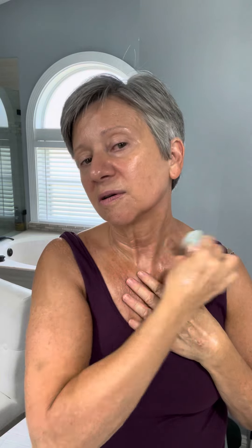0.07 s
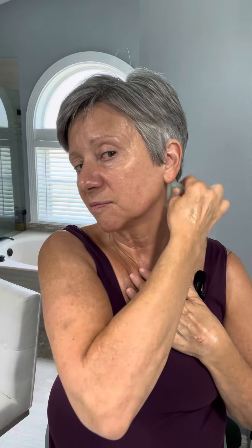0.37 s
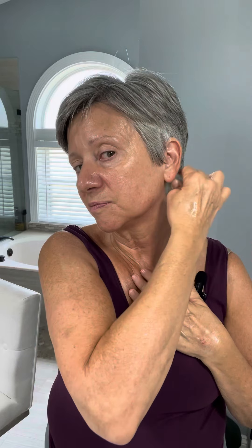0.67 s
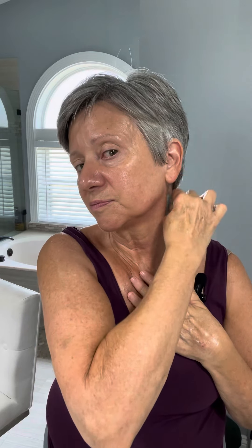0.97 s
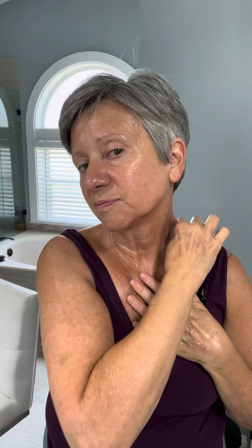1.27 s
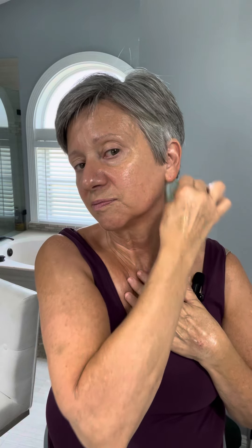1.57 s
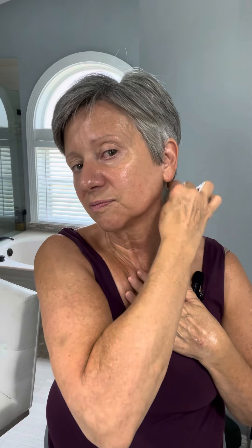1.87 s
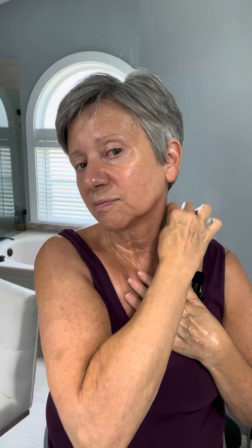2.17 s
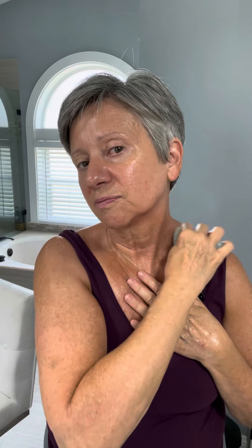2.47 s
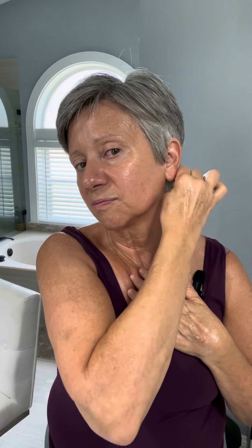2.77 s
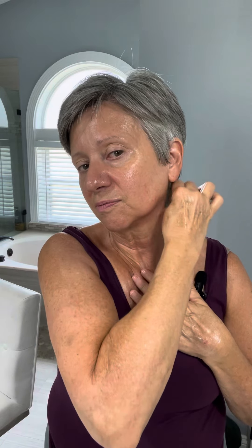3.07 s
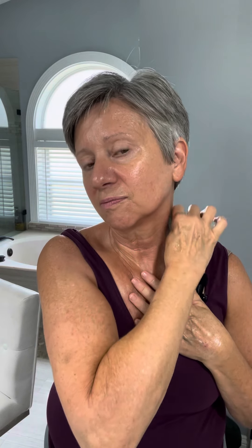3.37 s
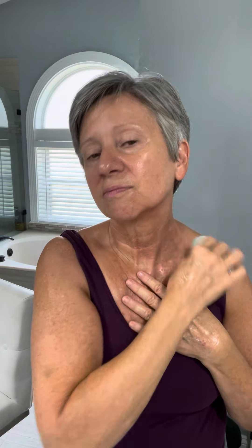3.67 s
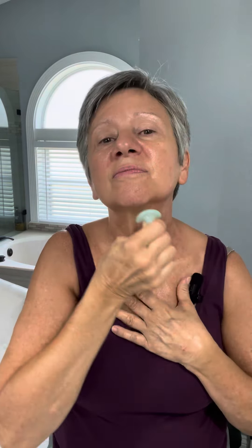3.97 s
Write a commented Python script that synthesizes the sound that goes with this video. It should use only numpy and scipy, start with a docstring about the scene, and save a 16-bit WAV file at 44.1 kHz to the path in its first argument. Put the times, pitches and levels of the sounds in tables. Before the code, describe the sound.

A small suction cup pops off oiled skin right at the start, then more softly at about 1.1 seconds. A louder, fluttering pop comes at 2.2 seconds and a doubled one around 3.5 seconds. Each has a tiny wet squeak, a fizz of air and a hollow puff, ringing briefly in a tiled bathroom. A faint, low ventilation hum runs underneath.

```python
"""A small soft suction cup, drawn down oiled skin, is pulled off four times in a tiled bathroom.
As the seal breaks, the rim flutters against the skin and rings the cup, air fizzes in through the
wet gap, the opening gap gives mostly falling tones, and the freed cup puffs hollowly.
The room rings on over a low ventilation hum."""
import sys
import numpy as np
from scipy import signal
from scipy.fft import rfft, irfft
from scipy.io import wavfile

SR = 44100
rng = np.random.default_rng(int(sys.argv[2]) if len(sys.argv) > 2 else 0)


def materialize(psi):
    """Save the field psi as 16-bit PCM at rate SR to the path in sys.argv[1].

    A 1-D psi becomes a single channel; in a 2-D psi each row is a channel.
    """
    bounded = np.clip(np.atleast_2d(psi).T, -1, 1)
    quanta = np.round(bounded * 32767).astype(np.int16)
    wavfile.write(sys.argv[1], SR, quanta)


N = 176400

# ventilation rumble spectrum: freq_hz, relative_db
RUMBLE_SPECTRUM = [(15, -61), (25, -24.5), (33, -8.5), (43, -2.5), (64, -2), (85, -7), (118, -6.5),
                   (150, -19), (250, -24), (326, -25), (450, -39.5), (1000, -47.5), (3000, -54.5),
                   (7000, -58.5), (15000, -64.5)]
# ventilation hum before the bass swell: pitch_hz, level_db
HUM_TONES = [(59.2, -59), (107.7, -72.5)]
# ventilation bass swell: time_s, gain_db
BASS_SWELL = [(0, 6.5), (.4, -1.5), (.8, -3.5), (1.7, -5.5), (2.35, -1), (2.6, -1), (3.3, 1.5), (3.7, 7.5),
              (4, 1.5)]
# air inrush: start_s, swell_s, fade_s, onset_re_peak_db, hiss_db, fizz_db
AIR_RUSHES = [(0.028, 0.0065, 0.066, -1.5, -43, -46.5), (1.0800, 0.032, 0.12, -14, -48, -53.5),
              (2.239, 0.029, 0.031, -4.5, -37, -42), (3.4189, 0.032, .012, -7, -29, -43.5),
              (3.468, 0.034, .038, -8, -28.5, -32)]
# hiss past the rim: freq_hz, relative_db
HISS_SPECTRUM = [(200, -10.5), (600, -5), (1500, 6), (2400, 1), (3200, -1), (4400, -8.5), (5200, -5),
                 (6000, -7), (6900, -3), (8100, -11.5), (9000, -35.5), (11000, -26.5), (16000, -40.5)]
# oil film fizz: freq_hz, relative_db
FIZZ_SPECTRUM = [(3000, -37), (6500, -20.5), (9000, -29), (10300, 3), (12300, 4.5), (14200, -15.5),
                 (15300, 1), (16500, -12)]
# rim flutter: start_s, swell_s, fade_s, start_hz, peak_hz, end_hz, onset_re_peak_db, slap_db, snap_db
RIM_FLUTTERS = [(0.0309, 0.0062, 0.0022, 340, 338, 350, -11, -7.5, -36.5),
                (1.1025, 0.0076, 0.026, 493, 477.3, 441, -20, -22.5, -47),
                (2.235, .0100, 0.046, 166.6, 250.7, 310.2, -3, 9.5, -27.5),
                (3.4213, 0.024, 0.028, 219.6, 238.3, 203, -8.5, 9, -34),
                (3.4734, 0.029, 0.028, 225.6, 240.5, 350, -15, 18, -36)]
# cup response to a slap: freq_hz, gain_db
CUP_RESPONSE = [(30, -60.5), (130, -40), (300, -15), (550, -16.5), (760, -11), (930, -0.5), (1080, 5),
                (1380, -2.5), (1620, -2.5), (1900, -8.5), (2400, -13), (3300, -19.5), (5000, -33.5),
                (6800, -35), (9000, -40.5), (15000, -47.5)]
# snap of the unsticking rim: freq_hz, relative_db
SNAP_SPECTRUM = [(2000, -34), (3200, -5), (5000, -17), (6200, -5.5), (7200, 3.5), (8200, -17),
                 (9000, -30.5), (11000, -12.5), (16000, -21)]
# air tones in the gap: start_s, swell_s, fade_s, start_hz, peak_hz, end_hz, level_db
GAP_TONES = [(0.0314, 0.0019, 0.0061, 1700, 1428, 800, -25), (0.042, .010, 0.069, 221, 109, 98, -33),
             (1.0807, 0.0111, .016, 1402, 1420, 976, -37.5), (1.0990, 0.0175, 0.011, 637, 444, 450, -49),
             (1.1180, .012, 0.0057, 465, 432, 270, -37), (1.1370, .007, 0.019, 335, 279, 213, -34),
             (2.2450, .028, 0.01, 254.2, 255, 230, -30), (2.245, 0.0062, 0.029, 1072, 1055, 716, -25.5),
             (3.502, 0.027, 0.048, 228, 313, 346, -32.5), (3.5080, 0.052, 0.018, 629, 641, 640, -32)]
# puffs as the cup comes free: start_s, swell_s, fade_s, level_db
RELEASE_PUFFS = [(0.038, 0.011, 0.062, -48), (1.089, 0.049, 0.056, -41), (2.242, .028, 0.03, -28),
                 (3.496, 0.015, 0.053, -31)]
# hollow puff spectrum: freq_hz, relative_db
PUFF_SPECTRUM = [(70, -41.5), (160, -23.5), (230, -3.5), (330, -4), (420, 0), (520, 1), (680, 0.5),
                 (900, -3), (2000, -35.5)]
# room decay: freq_hz, t60_s
ROOM_DECAY = [(150, 0.73), (400, 0.5669), (1000, 0.5917), (2800, 0.6314), (7000, 0.5079), (12000, 0.5361),
              (16000, 0.54)]
# reverberation colour: freq_hz, relative_db
TAIL_SPECTRUM = [(60, -13.5), (200, -5.5), (350, 1.5), (700, -0.5), (1300, -4), (3000, 0), (7000, -2.5),
                 (9000, -7.5), (11500, -9.5), (15000, -16.5)]
# room standing waves: freq_hz, t60_s, relative_db
STANDING_WAVES = [(109, 0.57, -39), (303, 0.36, -59.5), (651, 0.81, -57.5), (1070, 0.91, -54),
                  (1240, 0.44, -60)]


def undb(db):
    """Decibels to gain."""
    return 10 ** (np.asarray(db) / 20)


def unit(x):
    """Scale to rms 1."""
    return x / np.sqrt(np.mean(x ** 2))


def at_hz(points, hz):
    """Interpolate (freq_hz, value) points on a log-frequency axis."""
    freqs_hz, values = np.array(points, float).T
    return np.interp(np.log(np.maximum(hz, 1)), np.log(freqs_hz), values)


def colour(x, points):
    """Minimum-phase filter from (freq_hz, gain_db) points."""
    gain = undb(at_hz(points, np.fft.rfftfreq(2 * N, 1 / SR)))
    cepstrum = irfft(np.log(gain))
    cepstrum[1:N] *= 2
    cepstrum[N + 1:] = 0
    return irfft(rfft(x, 2 * N) * np.exp(rfft(cepstrum)))[..., :x.shape[-1]]


def noise(points):
    """Coloured noise, rms 1."""
    return unit(colour(rng.standard_normal(N), points))


def wide_noise(points):
    """Coloured noise, scattered differently to each side by the hand."""
    return np.array([noise(points), noise(points)])


def envelope(start_s, swell_s, fade_s, onset_db, fade_db=-18, attack_s=0.0011, release_s=0.005):
    """Attack to onset_db, swell to 0 dB, fade to fade_db, release."""
    t = np.arange(N) / SR - start_s
    body = undb(np.interp(t, [0, swell_s, swell_s + fade_s], [onset_db, 0, fade_db]))
    attack = np.clip(t / attack_s + 1, 0, 1)
    release = np.exp(-np.maximum(t - swell_s - fade_s, 0) / release_s)
    return body * attack * release


def glide_hz(start_s, swell_s, fade_s, path_hz):
    """Frequency through its start, peak and end values; zero before start_s."""
    t = np.arange(N) / SR - start_s
    return np.interp(t, [0, swell_s, swell_s + fade_s], path_hz) * (t >= 0)


def ventilation(rumble_db=-57.5, diffuse_hz=350, swell_below_hz=85):
    """Rumble and hum: near mono in the bass, diffuse above. Only the bass swells."""
    t = np.arange(N) / SR
    mid = noise(RUMBLE_SPECTRUM)
    side = colour(noise(RUMBLE_SPECTRUM), [(diffuse_hz / 4, -11), (diffuse_hz, -1)])
    hum = sum(np.sqrt(2) * undb(db) * np.sin(2 * np.pi * (hz * t + rng.random()))
              for hz, db in HUM_TONES)
    steady = undb(rumble_db) * np.array([mid + side, mid - side]) + hum
    bass = signal.sosfiltfilt(signal.butter(2, swell_below_hz, fs=SR, output="sos"), steady)
    swell = undb(np.interp(t, *np.array(BASS_SWELL).T))
    return steady + (swell - 1) * bass


def oil_fizz(clicks_per_s=5000, spread_db=2):
    """Dense tiny clicks of uneven size in the oil film, rms 1."""
    size = undb(spread_db * np.minimum(rng.exponential(size=N), 4))
    clicks = (rng.random(N) < clicks_per_s / SR) * size * rng.choice([-1, 1], (2, N))
    return unit(colour(clicks, FIZZ_SPECTRUM))


def air_rush(chop):
    """Air hisses past the rim and fizzes in the oil film, chopped by the flutter."""
    hiss, fizz = wide_noise(HISS_SPECTRUM), oil_fizz()
    return chop * sum(envelope(*timing_s, onset_db) * (undb(hiss_db) * hiss + undb(fizz_db) * fizz)
                      for *timing_s, onset_db, hiss_db, fizz_db in AIR_RUSHES)


def rim_flutter(jitter_cycles=0.012, scatter_db=0.8, lead_cycles=0.12, snap_decay_s=0.00049):
    """The rim snaps loose, admits air, then slaps the skin and rings the cup. Returns sound, air chop."""
    leak, air_decay_cycles = 0.3, 0.25
    t = np.arange(N) / SR
    slaps, snaps, chop = np.zeros(N), np.zeros(N), np.ones(N)
    for start_s, swell_s, fade_s, start_hz, peak_hz, end_hz, onset_db, slap_db, snap_db in RIM_FLUTTERS:
        deviations = rng.standard_normal((N // 100, 2))
        cycles = np.cumsum(glide_hz(start_s, swell_s, fade_s, [start_hz, peak_hz, end_hz])) / SR
        active = (t >= start_s) & (t < start_s + swell_s + fade_s)
        hits = np.flatnonzero(active & (np.diff(np.ceil(cycles), prepend=0) > 0))  # one per cycle
        lag, size = deviations[:len(hits)].T
        force = envelope(start_s, swell_s, fade_s, onset_db)[hits] * undb(scatter_db * size)
        hits += (jitter_cycles * lag * SR / peak_hz).astype(int)
        slaps[hits] += force * undb(slap_db)
        snaps[hits - int(lead_cycles * SR / peak_hz)] += force * undb(snap_db)
        since_snap_cycles = (cycles[active] + lead_cycles) % 1
        chop[active] = unit(leak + np.exp(-since_snap_cycles / air_decay_cycles))
    snap_envelope = signal.lfilter([1], [1, -np.exp(-1 / (snap_decay_s * SR))], snaps)
    return colour(slaps, CUP_RESPONSE) + snap_envelope * wide_noise(SNAP_SPECTRUM), chop


def gap_tones(wobble_depth=0.035, wobble_hz=250, octave_db=-31):
    """Squeaks and plops; pitch wobbles on the wet skin and mostly falls as the gap widens."""
    tones = np.zeros(N)
    wobble = 1 + wobble_depth * noise([(wobble_hz, 0), (4 * wobble_hz, -60)])
    for *timing_s, start_hz, peak_hz, end_hz, level_db in GAP_TONES:
        pitch_hz = glide_hz(*timing_s, [start_hz, peak_hz, end_hz]) * wobble
        phase = 2 * np.pi * np.cumsum(pitch_hz) / SR
        wave = np.sin(phase) + undb(octave_db) * np.sin(2 * phase)
        tones += undb(level_db) * envelope(*timing_s, onset_db=-5.5) * wave
    return tones


def release_puffs():
    """Air tumbles into the open cup."""
    flow = sum(undb(level_db) * envelope(*timing_s, onset_db=-16)
               for *timing_s, level_db in RELEASE_PUFFS)
    return flow * wide_noise(PUFF_SPECTRUM)


def bathroom(direct, tail_db=-2, build_s=0.0027, scatter_db=-6, scatter_s=0.003):
    """Direct sound plus close scatter, the tiled room's diffuse tail and standing waves."""
    t = np.arange(SR) / SR
    bins_hz = np.fft.rfftfreq(SR, 1 / SR)
    white = rfft(rng.standard_normal((2, SR)))
    tail = 0
    for centre_hz, t60_s in ROOM_DECAY:
        band = at_hz([(hz, hz == centre_hz) for hz, _ in ROOM_DECAY], bins_hz)
        tail += irfft(white * band) * undb(-60 * t / t60_s)
    tail *= 1 - np.exp(-t / build_s)
    tail = colour(unit(tail), TAIL_SPECTRUM)
    scatter = unit(rng.standard_normal((2, SR)) * t * np.exp(-t / scatter_s))
    response = (undb(tail_db) * tail + undb(scatter_db) * scatter) / np.sqrt(SR)
    for hz, t60_s, relative_db in STANDING_WAVES:
        mode = np.sin(2 * np.pi * (hz * t + rng.random((2, 1))))
        response += 0.1 * undb(relative_db - 60 * t / t60_s) * mode
    return direct + signal.fftconvolve(direct, response, axes=1)[:, :N]


def scene():
    """Four pops in the humming room."""
    flutter, chop = rim_flutter()
    pops = flutter + gap_tones() + air_rush(chop) + release_puffs()
    return bathroom(pops) + ventilation()


def record(dry, cutoff_hz=15900):
    """Steep low-pass."""
    return signal.sosfilt(signal.ellip(10, 0.2, 80, cutoff_hz, fs=SR, output="sos"), dry)


dry = scene()
out = record(dry)
materialize(out)
```